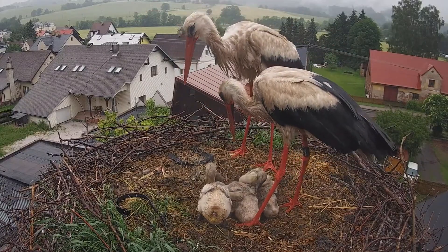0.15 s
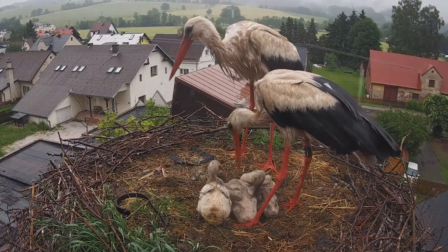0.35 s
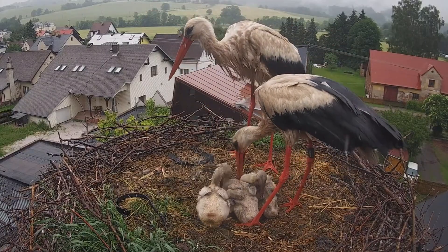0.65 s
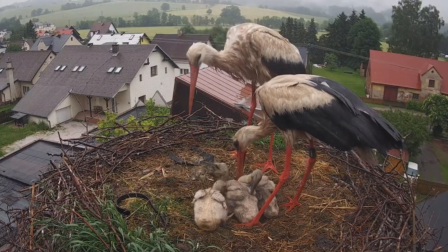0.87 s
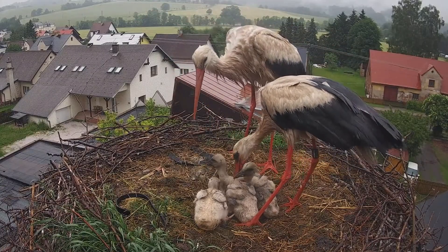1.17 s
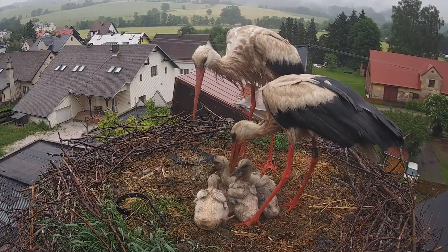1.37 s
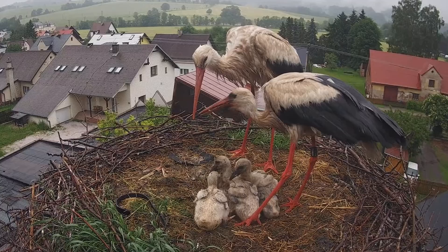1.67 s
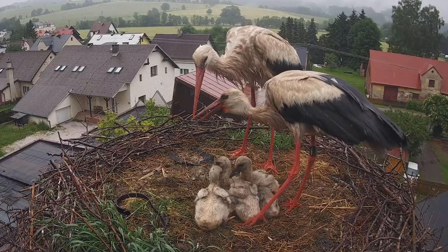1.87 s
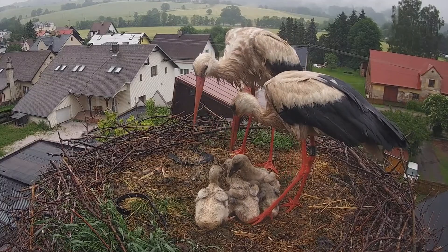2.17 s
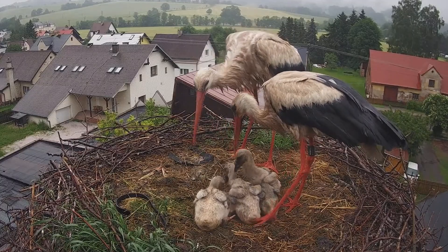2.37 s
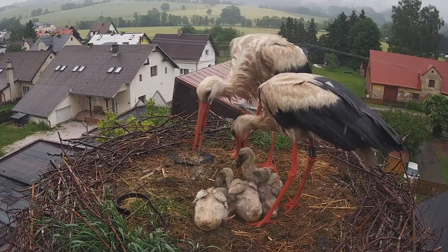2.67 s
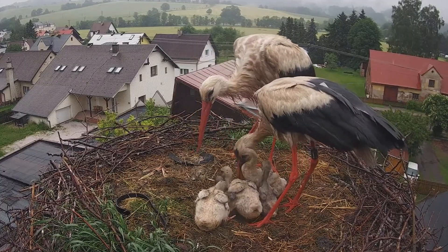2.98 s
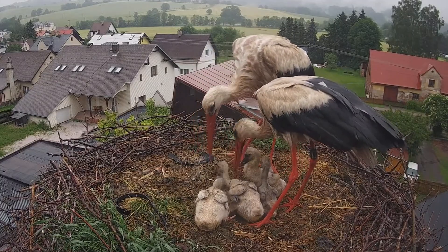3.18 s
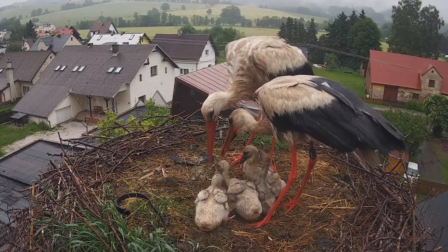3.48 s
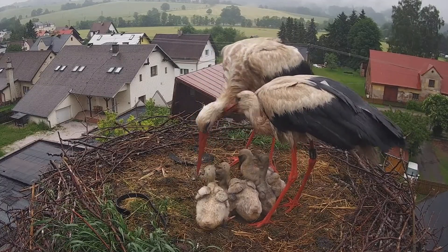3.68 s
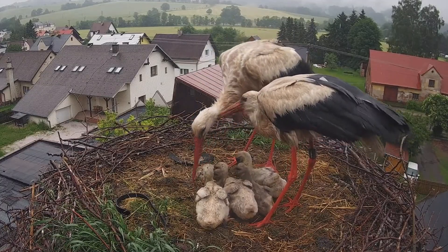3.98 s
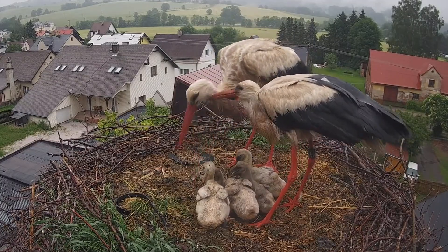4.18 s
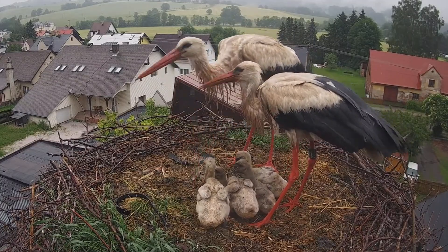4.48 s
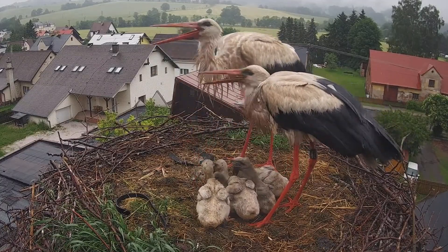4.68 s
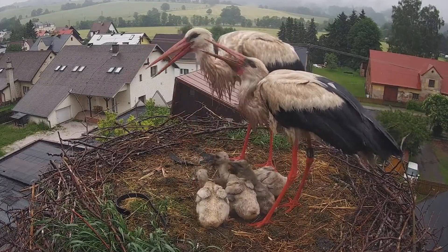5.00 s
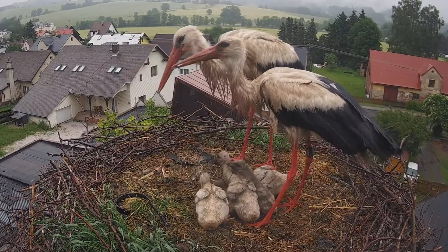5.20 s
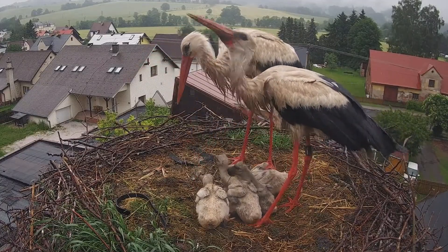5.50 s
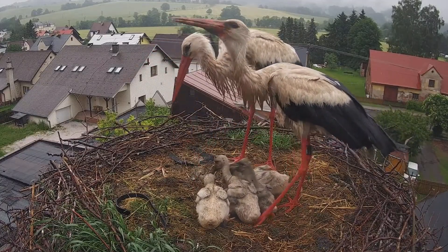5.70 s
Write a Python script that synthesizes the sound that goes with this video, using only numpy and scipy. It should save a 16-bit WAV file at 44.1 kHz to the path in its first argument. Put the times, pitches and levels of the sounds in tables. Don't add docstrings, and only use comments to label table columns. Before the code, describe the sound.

Steady rain hisses on roofs throughout, uneven and softly gusting, with a faint low gutter hum; its level creeps up as the recorder gains. In the first half second a faint whistle rises slowly amid airy panting. Small dry ticks and a quick falling chirp come at 0.6 s, then a double-humped whistle and low quavering notes from 0.8 to 1.5 s. A small bird trills high and buzzy from 1.7 to 2.1 s with crisp bill ticks and arched peeps. More chirps and sharp ticks follow to 2.7 s; at 2.8 s there is a forced squeak, soft nest bumps and a creak. From 3.0 to 3.4 s loud warbles turn into hoarse wheezes, then a rapid creaky rattle of voice at 3.75-3.95 s. After 4 s chicks answer with squeaks, heavy breaths, ticks and falling notes, ending in bright arches around 5.5 s and a fading wheeze. Close, mono, lightly echoing, thinned treble.

```python
import sys
import numpy as np
from scipy import signal
from scipy.fft import rfft, irfft, next_fast_len
from scipy.io import wavfile
from scipy.ndimage import uniform_filter1d

SR = 44100
rng = np.random.default_rng(int(sys.argv[2]) if len(sys.argv) > 2 else 0)


def nominal_scale(level):
    x = np.asarray(level, float) / 20
    return 10 ** x


def output_pcm(signal):
    pcm = np.clip(np.atleast_2d(signal).T, -1, 1) * 32767
    wavfile.write(sys.argv[1], SR, np.round(pcm).astype(np.int16))


N = 257968


def level(x, db):
    return x * nominal_scale(db) / np.sqrt(np.mean(np.abs(x) ** 2))


def colour(x, points):
    hz, db = np.transpose(points)
    n = next_fast_len(N)
    axis = np.log(np.fft.rfftfreq(n, 1 / SR) + 1)
    return irfft(rfft(x, n) * nominal_scale(np.interp(axis, np.log(hz), db)), n)[:N]


def walk(rate, n=N):
    hold = max(int(SR / rate), 1)
    stairs = np.repeat(rng.standard_normal(n // hold + 1), hold)
    return 1.37 * uniform_filter1d(uniform_filter1d(stairs, hold), hold)[:n]


def add(out, s, piece):
    i = max(int(s * SR), 0)
    out[i:i + len(piece)] += piece[:N - i]


def fades(n, edge_s):
    i = np.arange(n)
    return np.sin(np.pi / 2 * np.clip(np.minimum(i, n - i) / (edge_s * SR + 1), 0, 1)) ** 2


def recorder_gain():
    # time_s, gain_db
    gain_steps = [(0.0, -58), (0.31, -57.5), (0.52, -55.5), (1.92, -51.5), (2.36, -51), (4.69, -50),
                  (4.82, -50), (5.85, -50)]
    s, gain_db = np.transpose(gain_steps)
    return nominal_scale(np.interp(np.arange(N) / SR, s, gain_db - gain_db.mean()))


def rain(spread_db):
    # frequency_hz, density_db (per Hz)
    roof_tone = [(15, -42), (25, -11), (66, -2), (137, -10), (391, 0.5), (459, -4), (766, 0.5), (1540, -3),
                 (2020, -2), (5480, -8.5), (11700, -18), (15700, -54)]
    rain_db, drip_db, gust_db = -42.5, -44, 2
    hum_hz, hum_db = 403.4, -60.5
    wash, gust = 0, walk(10)
    for hz in 30 * 2 ** np.arange(0, 9.1, .5):
        edges = [(hz / 1.6, -40), (hz / 1.19, -3), (hz, 0), (hz * 1.19, -3), (hz * 1.6, -40)]
        flicker_db = 2.8 * walk(4.1) + gust_db * gust * min(120 / hz, 1)
        wash = wash + colour(rng.standard_normal(N), edges) * nominal_scale(flicker_db)
    weight_db = spread_db * np.minimum(rng.exponential(size=N), 2.4)
    drops = (rng.random(N) < .04) * rng.standard_normal(N) * nominal_scale(weight_db)
    drops = signal.lfilter([1], [1, -.9, .5], drops)
    wet = level(wash, 0) + nominal_scale(drip_db - rain_db) * level(drops, 0)
    gutter = walk(45) * np.sin(2 * np.pi * hum_hz * np.arange(N) / SR)
    return level(colour(wet, roof_tone), rain_db) + level(gutter, hum_db)


def trill(top_hz):
    # start_s, peak_db, sweep_hz (upward), fade_s
    trill_notes = [(1.657, -37, 302, 0.025), (1.697, -34.5, 300, 0.015), (1.739, -39, 1480, 0.0084),
                   (1.804, -33.5, 800, 0.016), (1.845, -29, 1900, 0.012), (1.864, -49, 200, .015),
                   (1.891, -26.5, 1900, 0.0091), (1.99, -51, 200, 0.014), (2.017, -28, 1680, 0.012),
                   (2.065, -26, 1700, 0.0058)]
    out, t = np.zeros(N), np.arange(0, .04, 1 / SR)
    for s, db, sweep_hz, hold_s in trill_notes:
        phase = 2 * np.pi * np.cumsum(top_hz - sweep_hz * np.exp(-t / 0.0032)) / SR
        buzz = nominal_scale(3.5 * walk(420, len(t)))
        tone = np.sin(phase + 0.85 * walk(900, len(t)))
        add(out, s, nominal_scale(db) * fades(len(t), 0.0031) * np.exp(-t / hold_s) * buzz * tone)
    return out


def bumps():
    # middle_s, peak_db, pitch_hz, length_s
    low_thumps = [(2.905, -46, 42, 0.033), (2.79, -50, 22, .03), (2.85, -37.5, 720, 0.018),
                  (2.93, -57, 130, .03), (2.89, -47, 270, .025), (2.87, -39, 1050, .015)]
    t = np.arange(N) / SR
    s, db, hz, span = np.transpose(low_thumps)[:, :, None]
    swells = np.exp(-((t - s) / span) ** 2) * np.cos(2 * np.pi * hz * (t - s))
    return np.sum(nominal_scale(db) * swells, axis=0)


def ticks(crack):
    # start_s, peak_db, ring_hz, ring_ms
    bill_ticks = [(.199, -35, 5900, .6), (0.5696, -20.5, 4530, 0.05), (.58, -36, 5200, .7),
                  (.59, -37, 5900, .9), (.608, -34, 5730, .9), (0.664, -21.5, 2500, 0.17),
                  (.671, -24, 2545, 0.12), (1.739, -25, 5740, 0.25), (1.742, -24, 5800, 0.25),
                  (1.955, -23, 6130, .4), (2.344, -31, 6500, .3), (2.4713, -16, 5430, 0.3),
                  (1.896, -23, 6000, .4), (2.656, -21, 5400, 0.5), (2.678, -17, 5140, 0.46),
                  (2.756, -30, 5200, 0.49), (4.502, -15, 5300, 0.3), (4.648, -19, 5900, 0.077)]
    out, t = np.zeros(N), np.arange(0, .01, 1 / SR)
    for s, db, hz, ring_ms in bill_ticks:
        u = t / (ring_ms / 1000)
        snap = crack * uniform_filter1d(rng.standard_normal(len(t)), size=4) * np.exp(-u / 2)
        ring = np.sin(2 * np.pi * hz * t) * u * np.exp(1 - u)
        add(out, s, nominal_scale(db) * (ring + snap))
    return out


def breath(flicker_db, creep):
    # middle_s, length_s, chest_db, beak_above_chest_db
    pants = [(0.353, 0.26, -48, -8), (0.965, 0.34, -42.5, -6.5), (1.458, 0.14, -49.5, -6),
             (1.957, 0.49, -47, -8), (2.317, 0.16, -40.5, -3), (2.594, 0.48, -49.5, -20),
             (2.8, 0.068, -47, 2), (2.87, 0.48, -41.5, -9), (3.305, 0.61, -40, -6),
             (3.82, 0.29, -36.5, -17), (4.068, 0.2, -44.5, 4), (4.144, 0.12, -38, -10),
             (4.313, 0.19, -32.5, -17), (4.48, 0.75, -39.5, 0), (4.867, 0.16, -39, -3.5),
             (5.358, 1, -47.5, -9), (5.565, 0.14, -38, -16)]
    # frequency_hz, density_db (per Hz)
    chest_tone = [(300, -28), (600, -2), (1000, -2), (2000, -2), (3500, -3), (5000, -9), (7000, -27.5)]
    # frequency_hz, density_db (per Hz)
    beak_tone = [(2500, -65), (4000, 7.5), (6000, 7), (7500, -0.5), (8800, -0.5), (9600, -8), (12000, -10),
                 (13500, -27), (15500, -47)]
    rest_chest_db, rest_beak_db = -51.5, -58.5

    def hiss(tone):
        return level(colour(rng.standard_normal(N), tone), 0) * nominal_scale(flicker_db * np.tanh(walk(60)))

    t = np.arange(N) / SR
    s, span, db, open_db = np.transpose(pants)[:, :, None]
    bells = np.exp(-(3.13 * (t - s) / span) ** 2)
    chest = hiss(chest_tone) * (creep * nominal_scale(rest_chest_db) + np.max(nominal_scale(db) * bells, axis=0))
    beak = hiss(beak_tone) * (creep * nominal_scale(rest_beak_db) + np.max(nominal_scale(db + open_db) * bells, axis=0))
    return nominal_scale(1.5) * chest + nominal_scale(4.5) * beak


def rasp(calls, db):
    push = np.sqrt(uniform_filter1d(calls ** 2, SR // 50) + 1e-12)
    edge_tone = [(6000, -24), (8000, 1), (15000, -17)]
    return nominal_scale(db) * push * level(colour(rng.standard_normal(N), edge_tone), 0)


def creak(puff_ms, uneven_db, slip):
    # first_puff_s, puffs (whole ones sound), gap_ms, ring_hz, peak_db
    bouts = [(2.815, 4, 9.5, 5100, -21), (3.7585, 1.02, 9, 4000, -15.5), (3.7675, 6.6, 5.9, 3690, -19),
             (3.815, 1.03, 6, 3620, -18), (3.8435, 6.4, 6.5, 3650, -18.5), (3.8895, 2, 7.5, 3600, -25),
             (3.926, 1, 6, 3530, -23), (3.953, 0.97, 6, 3650, -23)]
    out, t = np.zeros(N), np.arange(-.006, .006, 1 / SR)
    for s, count, gap_ms, hz, db in bouts:
        for k, (late, size, bend, long) in enumerate(rng.standard_normal((int(count), 4))):
            bell = np.exp(-(t * 1000 / (puff_ms * (1 + 0.23 * np.tanh(long)))) ** 2)
            ring = np.sin(2 * np.pi * hz * (1 + 0.017 * bend) * t + 3 * late)
            start_s = s + t[0] + (k + slip * late) * gap_ms / 1000
            add(out, start_s, nominal_scale(db + uneven_db * np.tanh(size)) * bell * ring)
    return out


def wheeze(flutter_db, tonal, skirt_db, fade_db, strands):
    # start_s, end_s, throat_start_hz, throat_end_hz, level_db
    thin = [(0, .107, 3090, 2680, -44), (.105, .387, 2630, 2545, -48.5), (.233, .25, 4900, 4900, -46),
            (.85, .945, 2390, 2330, -43), (1.0, 1.05, 3120, 2790, -47), (1.952, 1.962, 1005, 1040, -34.5),
            (2.77, 2.8, 7040, 7500, -44), (3.204, 3.25, 3000, 2750, -37), (3.36, 3.38, 830, 800, -42),
            (3.715, 3.75, 3360, 3680, -41), (4.527, 4.635, 4150, 3750, -33), (4.545, 4.64, 3780, 3050, -37),
            (4.748, 4.833, 1900, 2110, -31.5), (4.826, 4.928, 1300, 1148, -38.5),
            (4.94, 4.997, 2080, 2070, -40.5), (4.44, 4.52, 4850, 4870, -35), (4.695, 4.72, 3500, 3450, -38),
            (4.715, 4.75, 2600, 2900, -40), (1.38, 1.415, 2100, 2000, -44), (5.27, 5.3, 4500, 4200, -46),
            (5.45, 5.49, 4300, 4250, -43), (3.94, 4.0, 3400, 3300, -37), (5.575, 5.76, 1930, 1842, -42.5)]
    reedy = [(.796, .875, 4840, 4800, -45.5), (.9, 1.012, 6260, 6270, -41),
             (1.41, 1.455, 2740, 2860, -39.5), (1.786, 1.897, 2890, 2785, -42),
             (1.9, 1.925, 7600, 8450, -40), (2.242, 2.28, 4800, 5000, -37),
             (2.245, 2.354, 4100, 3910, -35.5), (2.934, 2.996, 6700, 7060, -37.5),
             (2.99, 3.02, 3500, 4100, -32), (3.03, 3.049, 5400, 5100, -37),
             (3.243, 3.36, 2696, 2587, -28.5), (3.299, 3.41, 3860, 3810, -30),
             (3.763, 3.94, 3773, 3580, -32.5), (3.94, 3.975, 2050, 2800, -36.5),
             (3.995, 4.018, 3006, 2840, -29), (2.85, 2.95, 5100, 5000, -40),
             (4.345, 4.445, 5240, 4840, -36.5), (4.39, 4.45, 5550, 5600, -36),
             (4.522, 4.625, 7300, 7100, -45), (4.63, 4.705, 3840, 3920, -32.5),
             (4.824, 4.905, 2717, 3010, -32.5), (4.812, 4.941, 1852, 1506, -32.5),
             (5.36, 5.49, 4370, 4220, -45)]
    hoarse = [(.335, .392, 3200, 3170, -43), (.9, 1.0, 5300, 5330, -40.5), (1.673, 1.703, 5400, 5130, -45),
              (1.788, 1.831, 3700, 3620, -39), (1.948, 1.987, 6200, 6200, -37.5),
              (2.83, 2.947, 3200, 2626, -38.5), (3.062, 3.105, 3800, 3870, -29),
              (3.301, 3.486, 1950, 1502, -35.5), (3.35, 3.47, 2657, 2288, -33.5),
              (4.112, 4.145, 3080, 2224, -30.5), (4.12, 4.204, 1600, 1480, -38.5),
              (4.252, 4.336, 2400, 1896, -31.5), (4.345, 4.405, 2600, 3330, -27.5),
              (4.358, 4.395, 6700, 6930, -36.5), (4.443, 4.658, 1880, 1600, -30)]
    broad = [(.33, .385, 5150, 5100, -42.5), (.656, .675, 2675, 2270, -38), (2.555, 2.594, 3055, 3110, -36),
             (2.806, 2.954, 5230, 4960, -38), (2.808, 2.84, 6440, 6740, -35.5),
             (2.819, 2.9, 1400, 910, -41.5), (3.004, 3.142, 6180, 6500, -38.5),
             (3.249, 3.34, 6000, 5000, -38), (3.769, 3.901, 1903, 1606, -35.5),
             (4.009, 4.057, 3030, 5700, -31.5), (4.053, 4.103, 5660, 4470, -30),
             (4.828, 4.902, 6800, 7230, -42.5), (5.505, 5.56, 4780, 5280, -36),
             (5.56, 5.607, 2800, 1192, -39.5)]
    throats = [(thin, 230), (reedy, 440), (hoarse, 680), (broad, 1150)]  # (rows, width Hz)
    out = np.zeros(N)
    for start, end, from_hz, to_hz, db, width_hz in [(*row, w) for rows, w in throats for row in rows]:
        n = int((end - start) * SR)
        pitch = np.linspace(from_hz, to_hz, n) + 45 * walk(40.1, n)
        phase = 2 * np.pi * np.cumsum(pitch) / SR
        a, b = (walk(1.4 * width_hz, n) + nominal_scale(skirt_db) * walk(4000, n) for _ in range(2))
        tone = tonal * np.linspace(1.5, .5, n) * 300 / width_hz
        air = a * np.cos(phase) + (b + tone) * np.sin(phase)
        for side, drift in rng.standard_normal((3, 2)):
            away_hz = .45 * width_hz * (np.tanh(side) + .3 * drift * np.linspace(-1, 1, n))
            strand = np.sin(phase + 2 * np.pi * np.cumsum(away_hz) / SR)
            air = air + strands * (width_hz > 500) * np.maximum(walk(110, n), 0) * strand
        tiring_db = np.linspace(0, fade_db * np.sqrt(width_hz / 500), n)
        effort_db = flutter_db * walk(350, n) + 0.38 * walk(33.0, n) + tiring_db
        add(out, start, fades(n, 0.0028) * level(air * nominal_scale(effort_db), db + 0.5))
    return colour(out, [(300, -40), (700, 0), (9000, 0)])


def whistle(notes, octave_db, shimmer_db, wobble, quaver=0):
    arch_s, quaver_hz = .088, 43.9
    out = np.zeros(N)
    for note in notes:
        s, hz, db = np.transpose(note)
        t = np.arange(s[0], s[-1], 1 / SR)
        pitch = uniform_filter1d(np.interp(t, s, hz), len(t) // (2 * len(s)) + 1, mode="nearest")
        if len(t) < arch_s * SR and len(s) < 5:
            pitch = np.polyval(np.polyfit(s - s[0], hz, 2), t - s[0])
        pitch = pitch * (1 - quaver * np.linspace(0, 1, len(t)) * np.cos(2 * np.pi * quaver_hz * (t - s[0])))
        phase = 2 * np.pi * np.cumsum(pitch * (1 + wobble * walk(219, len(t)))) / SR
        loudness = np.interp(t, s, nominal_scale(db))
        tremble = np.sqrt(2) * nominal_scale(shimmer_db * np.tanh(walk(164, len(t)))) * fades(len(t), .0025)
        add(out, s[0], tremble * loudness * (np.sin(phase) + nominal_scale(octave_db) * np.sin(2 * phase)))
    return out


def arches(rows, top_at, start_db, top_db, end_db):
    notes = []
    for s, span, top, end, db in rows:
        start_hz = top - (top_at / (1 - top_at)) ** 2 * (top - end)
        notes.append([(s, start_hz, db + start_db), (s + top_at * span, top, db + top_db),
                      (s + span, end, db + end_db)])
    return notes


def glides(rows, high_db, low_db):
    notes = []
    for s, span, a, b, db in rows:
        first_db, last_db = (high_db, low_db) if a > b else (low_db, high_db)
        notes.append([(s, a, db + first_db), (s + span / 2, (a + b) / 2, db), (s + span, b, db + last_db)])
    return notes


def peeps():
    # start_s, length_s, from_hz, to_hz, level_db
    straight = [(.37, 0.013, 4580, 3960, -34.5), (.643, .01, 2900, 2950, -34),
                (.897, 0.022, 4650, 3450, -34), (2.946, 0.026, 3510, 1950, -34),
                (5.555, 0.029, 5000, 5700, -41.5), (3.051, 0.013, 4330, 3370, -28),
                (3.16, 0.056, 2314, 2135, -45), (3.285, 0.021, 4850, 3900, -30.5),
                (3.72, 0.0067, 5700, 6100, -33), (5.497, 0.021, 2850, 2420, -32.5),
                (5.517, .03, 2250, 1900, -40), (1.677, .02, 2900, 2880, -41),
                (1.797, .022, 2830, 2800, -37), (3.025, .02, 5150, 5450, -38),
                (1.265, 0.042, 2470, 2960, -49.5), (2.95, 0.13, 1770, 1660, -44.5)]
    # start_s, length_s, from_hz, to_hz, level_db
    quavers = [
        (.944, .125, 2100, 2000, -39),
        (1.278, .1, 2057, 2010, -37),
    ]
    sliding = whistle(glides(straight, 2.0, -2.1), -20, 3.5, 0.0048)
    return sliding + whistle(glides(quavers, -2.3, 0), -28, 3, .004, quaver=.045)


def split_voices():
    # start_s, length_s, from_hz, end_hz, level_db
    squeaks = [
        (4.083, .029, 3900, 2844, -27),
    ]
    # time_s, pitch_hz, level_db
    splits = [
        [(2.766, 3800, -40), (2.77, 3950, -37), (2.775, 4120, -27), (2.789, 4390, -29), (2.8, 3950, -33),
         (2.806, 3450, -33), (2.814, 3230, -36)],
        [(5.245, 2510, -37), (5.257, 2570, -33), (5.262, 2780, -46), (5.277, 3260, -38), (5.292, 2960, -42),
         (5.303, 2686, -30), (5.321, 2680, -29.5)],
        [(5.321, 2890, -37), (5.328, 3140, -35), (5.34, 3362, -34), (5.356, 3104, -38), (5.37, 2700, -39),
         (5.378, 2788, -41)],
    ]
    forced = whistle(glides(squeaks, -1, 0) + splits[:1], -2.5, 3.9, 0.0025)
    return forced + whistle(splits[1:], -14, 2.4, .004)


def clear_calls():
    # time_s, pitch_hz, level_db
    drawls = [
        [(.11, 1693, -55), (.246, 1970, -40), (.33, 1986, -44), (.4, 1950, -55)],
        [(1.085, 1857, -40), (1.145, 1800, -47), (1.215, 1690, -45)],
        [(3.697, 3160, -25), (3.725, 4700, -44), (3.743, 4750, -42), (3.757, 4070, -33)],
    ]
    # start_s, length_s, top_hz, end_hz, level_db
    swells = [(1.912, 0.0342, 4700, 4150, -28), (2.955, 0.05, 3550, 2800, -26.5),
              (1.748, 0.047, 4070, 3350, -28), (.765, 0.032, 3300, 2500, -43),
              (5.295, 0.027, 4050, 3900, -36), (5.187, .022, 3700, 3450, -41)]
    # time_s, pitch_hz, level_db
    warbles = [
        [(.63, 2980, -40), (.635, 2950, -32), (.639, 2850, -26), (.644, 2550, -34), (.649, 2250, -29),
         (.655, 2000, -36)],
        [(.63, 2980, -40), (.635, 2950, -32), (.639, 2850, -26), (.644, 2550, -34), (.649, 2250, -29),
         (.655, 2000, -36)],
        [(.835, 3010, -48), (.86, 3580, -40), (.885, 3610, -35), (.908, 3250, -34), (.925, 3680, -32),
         (.95, 3650, -30), (.995, 2940, -34)],
        [(1.425, 2504, -48), (1.45, 2520, -37), (1.475, 2314, -38.5), (1.515, 2300, -39.5), (1.53, 1950, -44)],
        [(2.21, 3140, -36), (2.228, 4260, -37.5), (2.25, 4050, -42), (2.262, 4100, -40), (2.272, 4550, -33),
         (2.279, 4000, -28), (2.286, 3300, -31)],
        [(2.487, 2910, -38), (2.496, 3500, -38), (2.507, 4250, -40), (2.522, 3700, -50), (2.541, 4280, -38),
         (2.552, 3700, -38), (2.564, 2900, -38)],
        [(3.025, 2811, -41), (3.049, 3270, -32), (3.081, 2910, -31.5), (3.109, 3350, -26.5),
         (3.15, 2940, -27.5), (3.165, 2780, -38), (3.19, 2620, -35), (3.202, 2800, -29.5)],
        [(3.2, 3330, -38), (3.212, 4213, -31), (3.225, 4500, -27), (3.237, 4150, -28), (3.25, 3230, -24)],
        [(3.205, 3300, -40), (3.215, 3750, -34), (3.228, 4080, -29), (3.238, 3900, -32), (3.245, 3500, -38)],
    ]
    # time_s, pitch_hz, level_db
    answers = [
        [(4.208, 3151, -33), (4.214, 3430, -35), (4.222, 3780, -40), (4.232, 4020, -37), (4.241, 3850, -37),
         (4.248, 3500, -23), (4.256, 3200, -32)],
        [(4.69, 3955, -35), (4.705, 3950, -32), (4.718, 3750, -41), (4.724, 3450, -33), (4.735, 3290, -33),
         (4.752, 2620, -34)],
        [(5.39, 2931, -43), (5.424, 3220, -36), (5.444, 3085, -38), (5.454, 2790, -42), (5.462, 2710, -32),
         (5.478, 2780, -38)],
        [(5.495, 3733, -32), (5.503, 4000, -26), (5.508, 4300, -30), (5.513, 4551, -27), (5.517, 4500, -34)],
        [(5.516, 3950, -28), (5.526, 4200, -27), (5.536, 4310, -24), (5.546, 4000, -29), (5.553, 3600, -27.5),
         (5.563, 3100, -31)],
    ]
    # time_s, pitch_hz, level_db
    dip = [(4.306, 4730, -38), (4.313, 4560, -33), (4.322, 4520, -30.5), (4.334, 4780, -27.5),
           (4.345, 5100, -39)]
    # above_hz, offset_db
    dip_sides = [
        (0, 0.5),
        (850, -13),
        (1900, -14),
        (2750, -9),
    ]
    stacked = [np.add(dip, (0, *side)) for side in dip_sides]
    notes = drawls + arches(swells, .45, -10, 0, -5.0) + warbles + answers + stacked
    return whistle(notes, -26, 2.8, 0.012)


def roof_echo(nest):
    t = np.arange(0, .2, 1 / SR)
    roofs = level(rng.standard_normal(len(t)) * np.exp(-t / 0.024), -8) / np.sqrt(len(t))
    return signal.fftconvolve(nest, roofs)[:N]


def scene():
    creep = recorder_gain()
    background = creep * rain(4.0) + breath(2.8, creep)
    air = creak(1.9, 2.5, .1) + wheeze(2.24, 0.67, -6.0, -3.5, .8)
    nest = trill(6800) + bumps() + ticks(0.58) + rasp(air, -25.0) + air
    nest = nest + peeps() + split_voices() + clear_calls()
    mono = background + nest + roof_echo(nest)
    return np.array([mono, mono])


def patchy_treble(x, from_hz, share, depth_db):
    top_hz = 15700
    hz, _, z = signal.stft(x, SR, nperseg=1024)
    luck = uniform_filter1d(rng.standard_normal((len(hz) // 4 + 1, z.shape[1])), size=5, axis=1)
    bar = np.quantile(luck, share) - np.clip((from_hz - hz) / 2500, 0, None)
    lost = np.repeat(luck, 4, axis=0)[:len(hz)] < bar[:, None]
    usual = np.median(np.abs(z), axis=1)[:, None]
    lost = lost & (uniform_filter1d(np.abs(z), size=5, axis=0) < 3.5 * usual)
    keep = np.where(lost, nominal_scale(depth_db), 1) * (hz[:, None] < top_hz)
    return signal.istft(z * keep, SR, nperseg=1024)[1][:N]


def low_pass(x):
    return signal.sosfilt(signal.butter(12, 15820, fs=SR, output="sos"), x)


def record(dry):
    ceiling = .23
    rounded = ceiling * np.tanh(dry[0] / ceiling)
    mono = patchy_treble(rounded, 7830, .3, -39)
    return low_pass(np.array([mono, mono]))


dry = scene()
out = record(dry)
output_pcm(out)
```